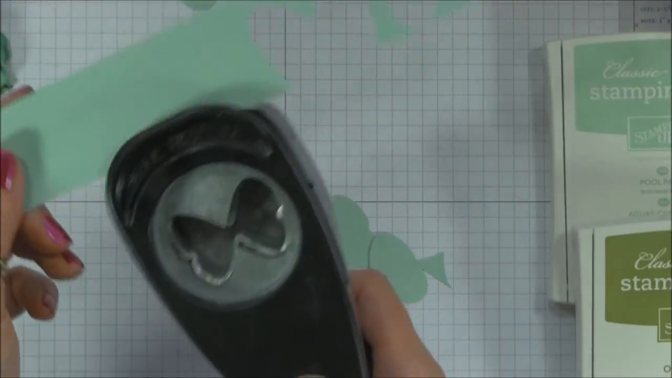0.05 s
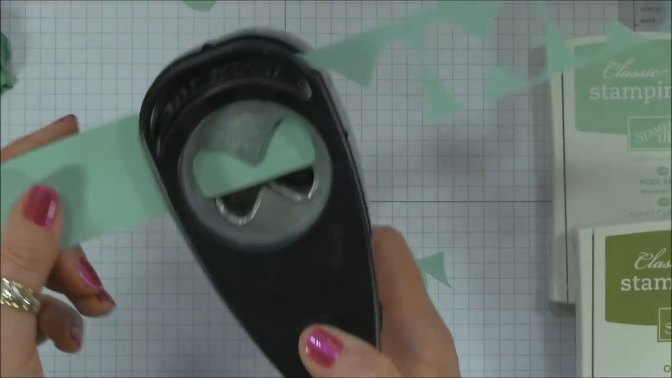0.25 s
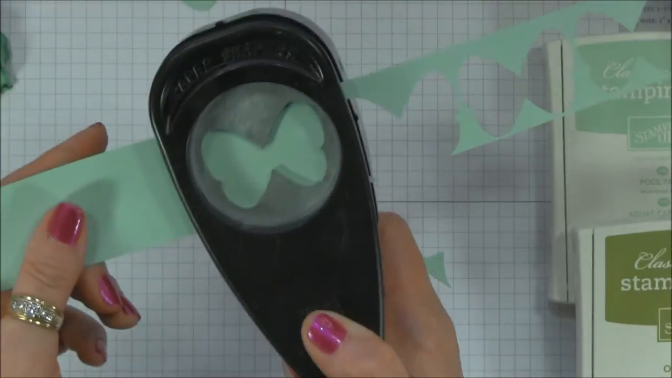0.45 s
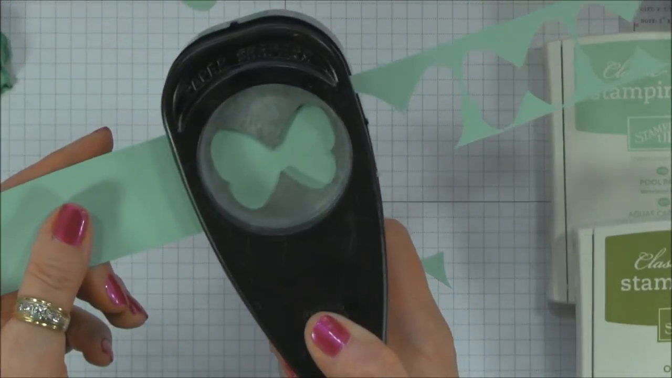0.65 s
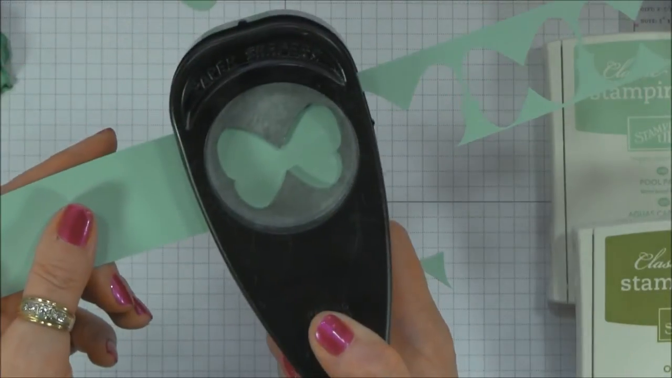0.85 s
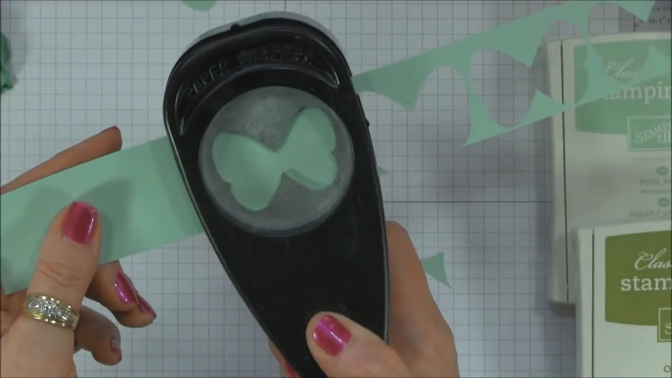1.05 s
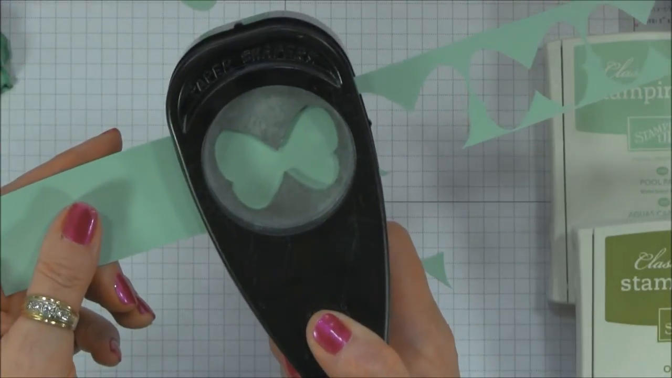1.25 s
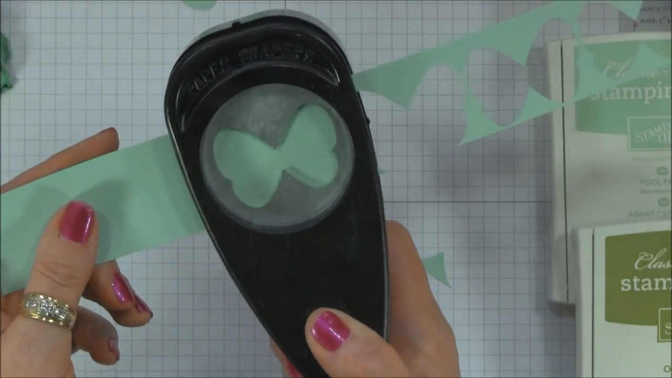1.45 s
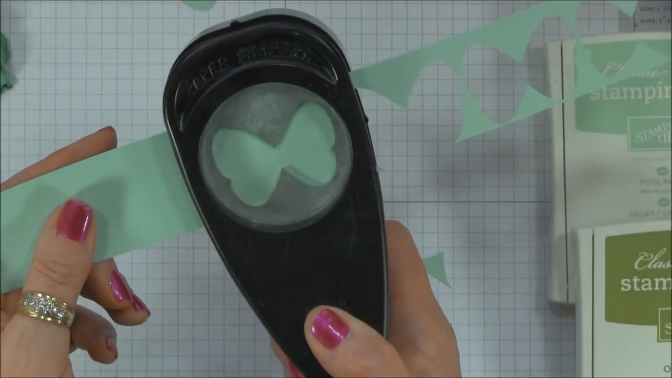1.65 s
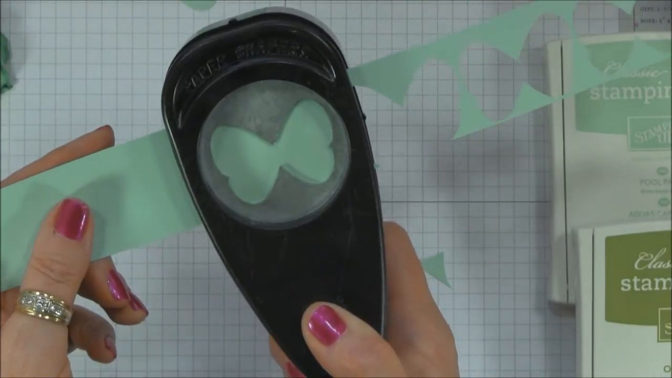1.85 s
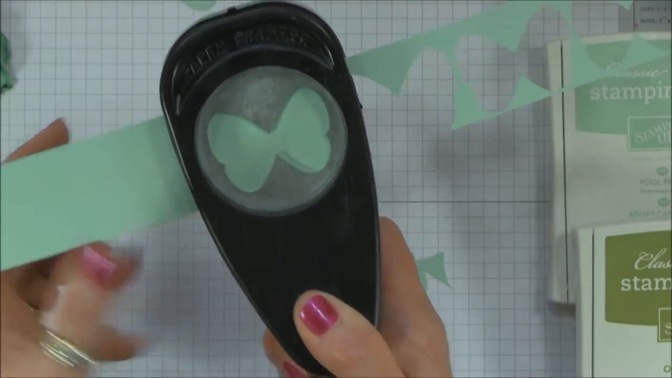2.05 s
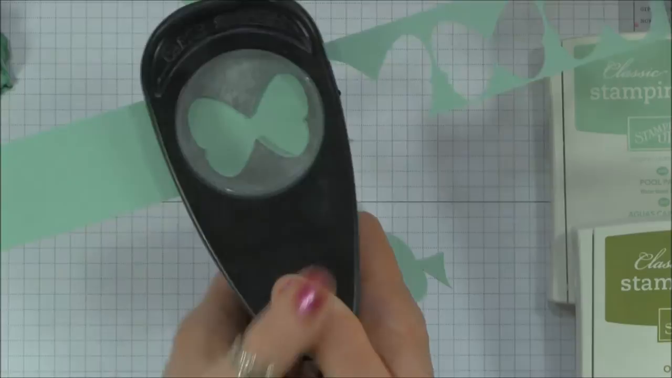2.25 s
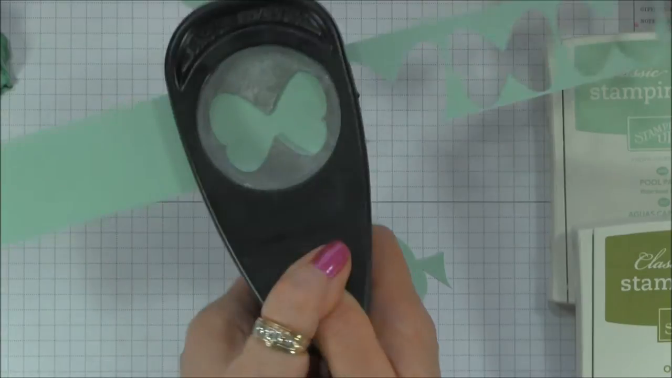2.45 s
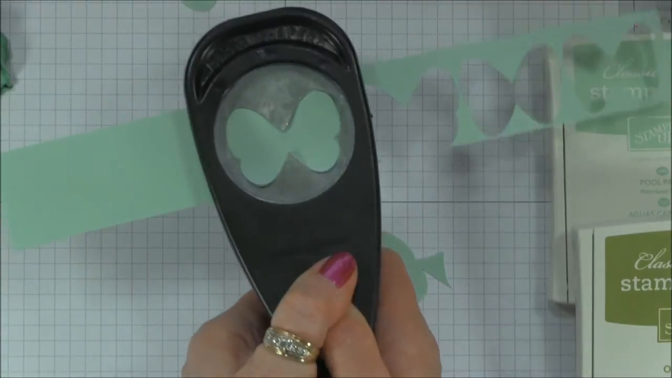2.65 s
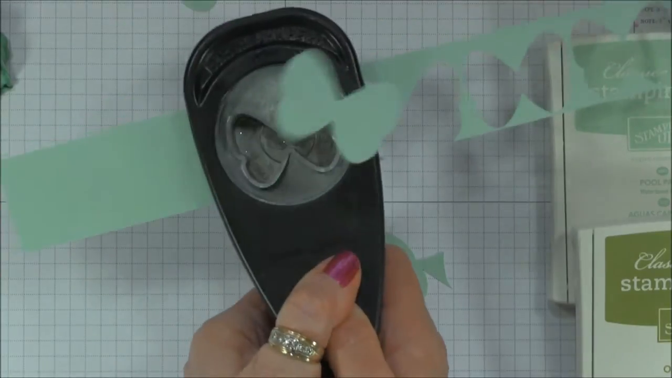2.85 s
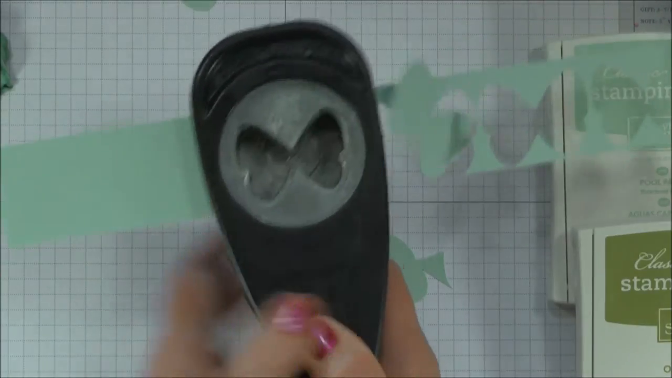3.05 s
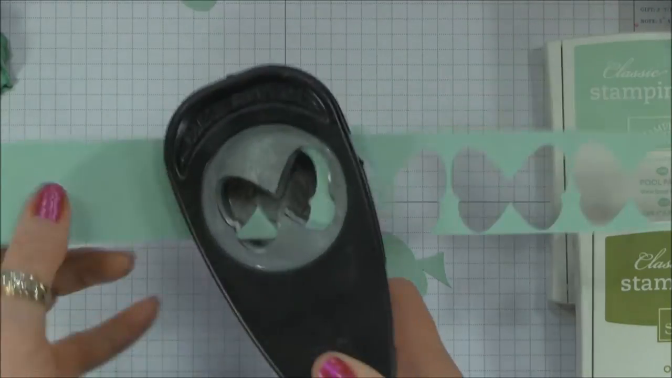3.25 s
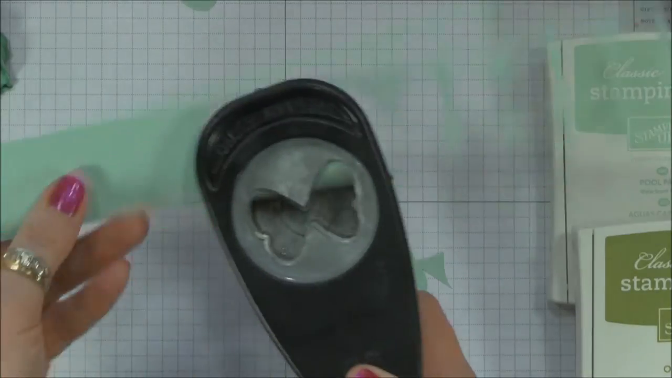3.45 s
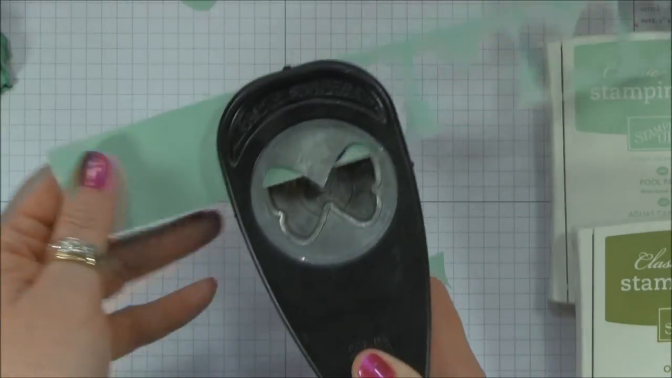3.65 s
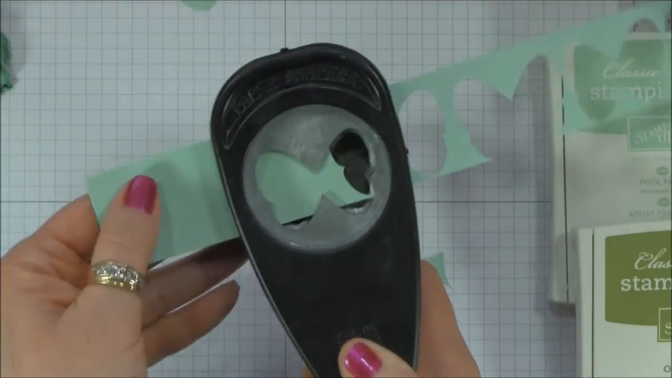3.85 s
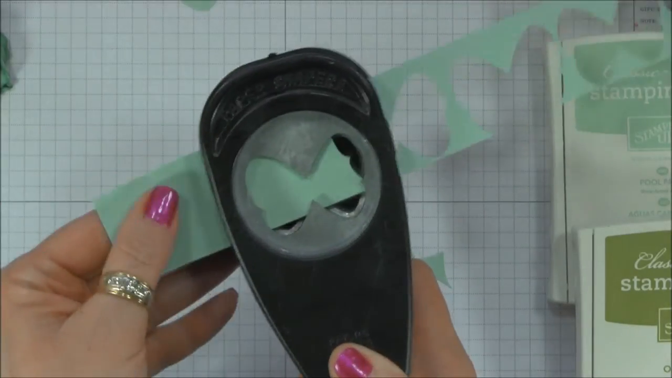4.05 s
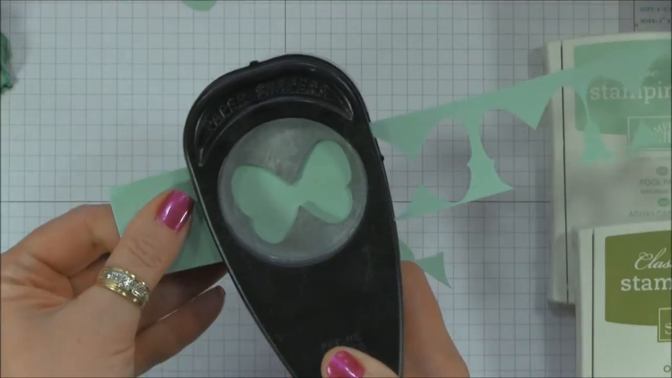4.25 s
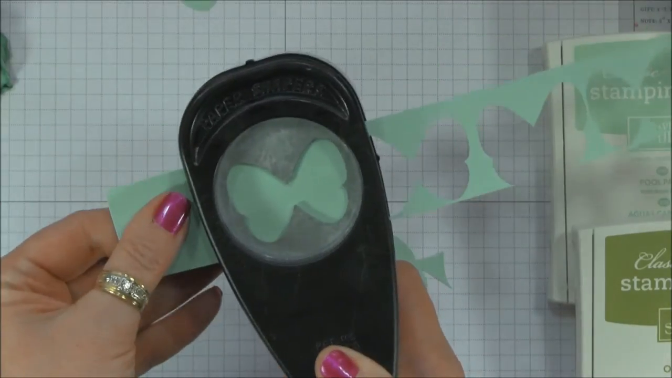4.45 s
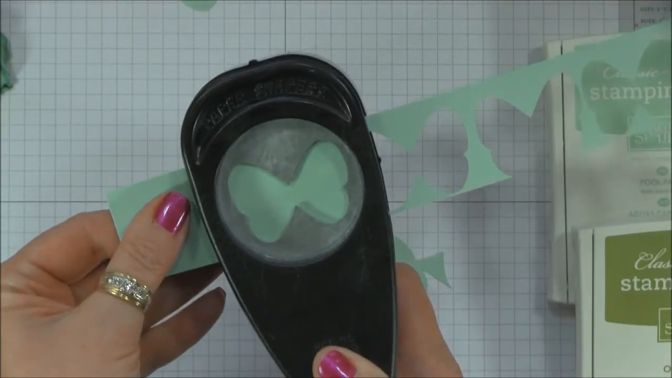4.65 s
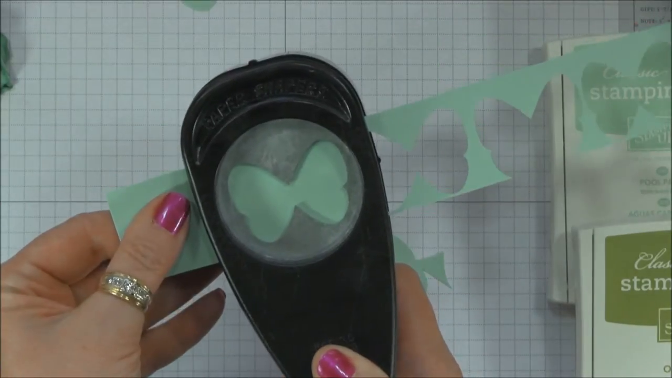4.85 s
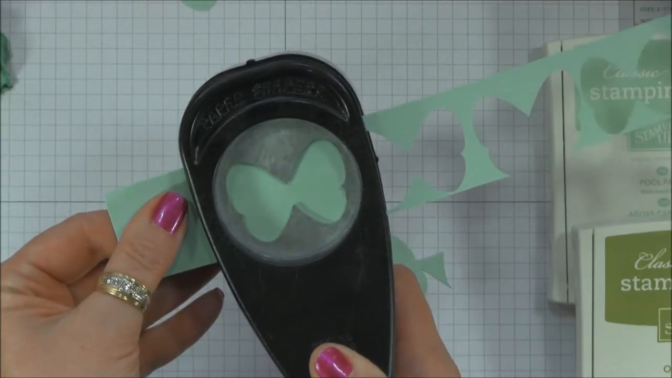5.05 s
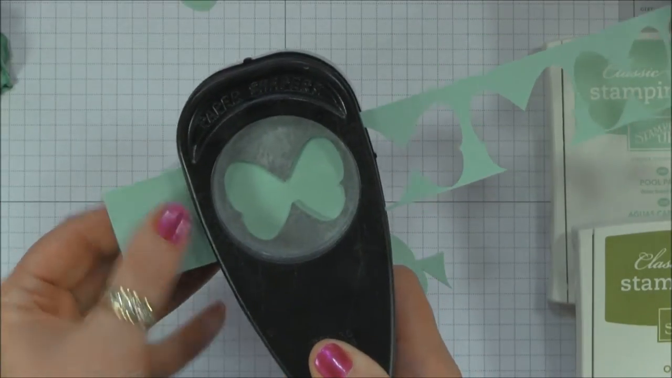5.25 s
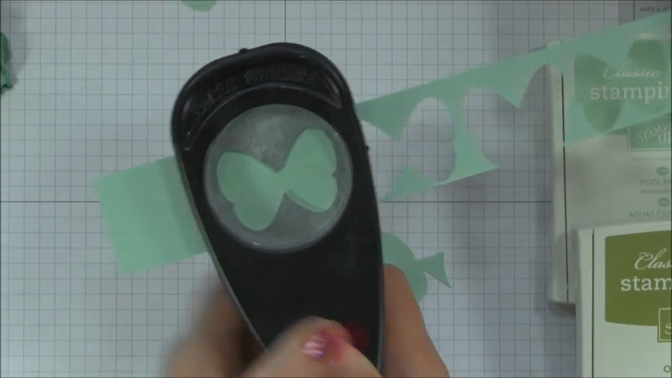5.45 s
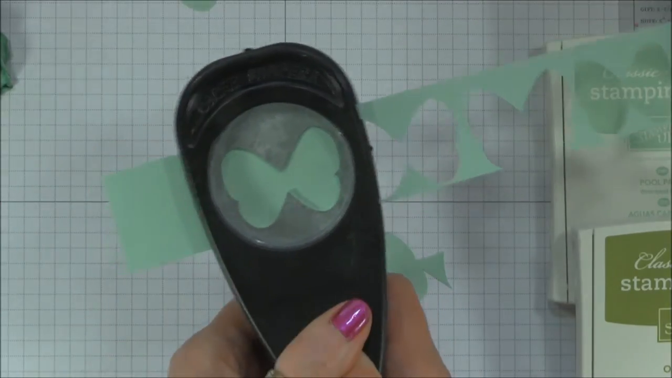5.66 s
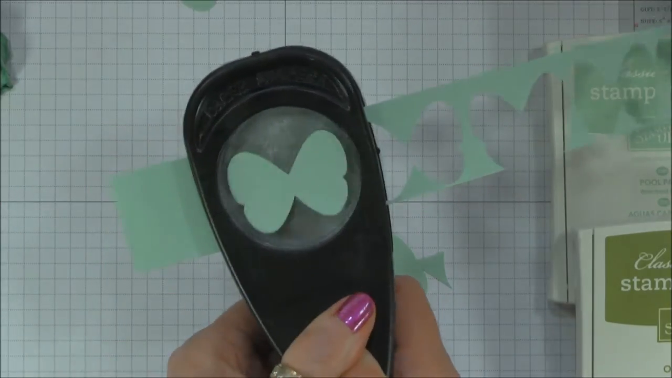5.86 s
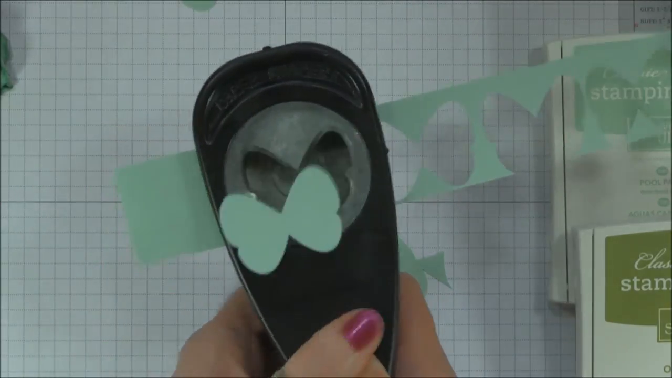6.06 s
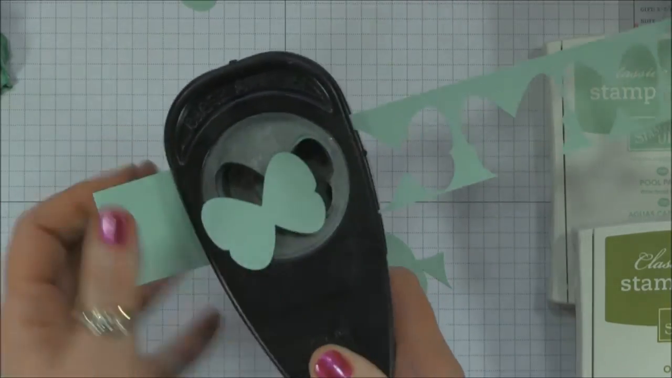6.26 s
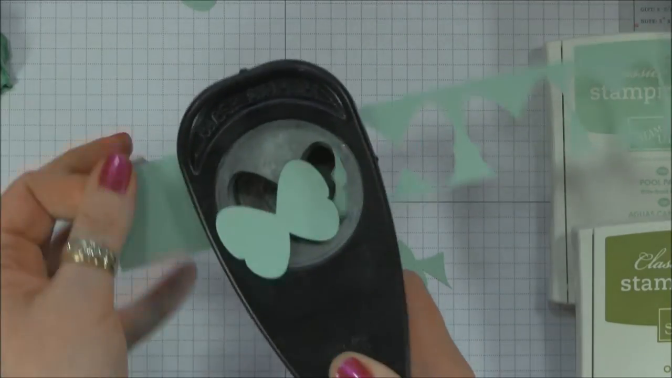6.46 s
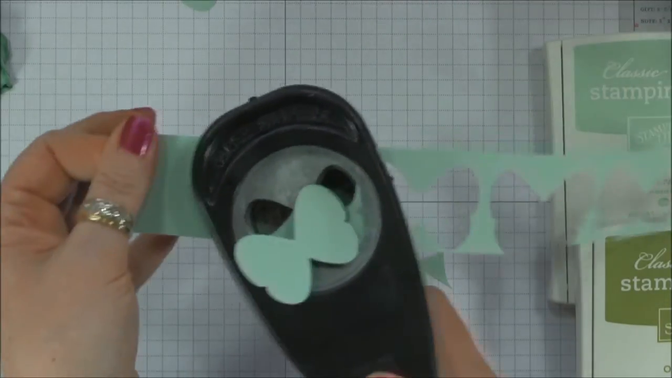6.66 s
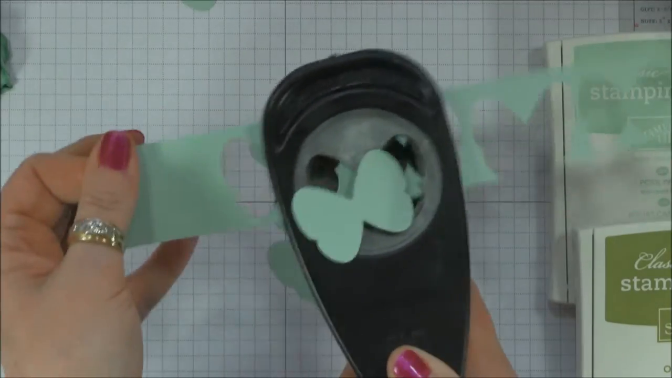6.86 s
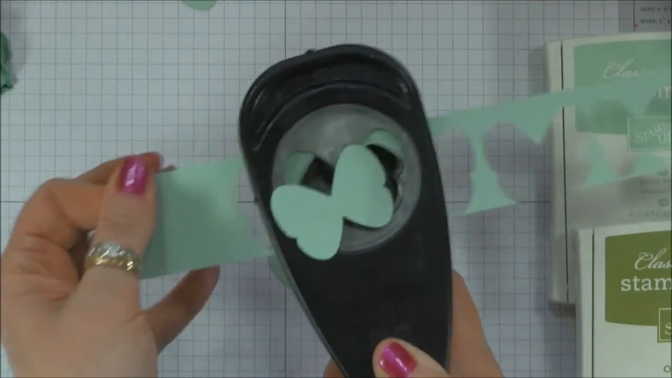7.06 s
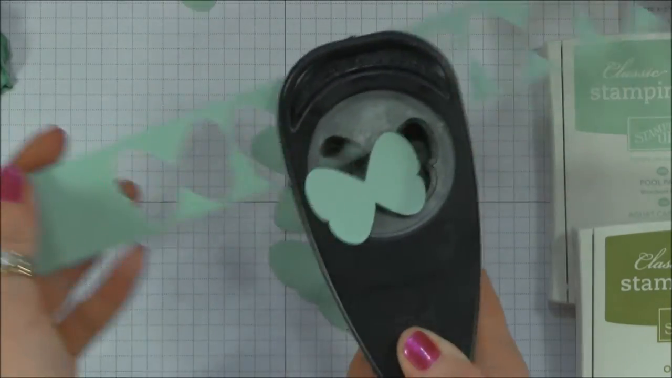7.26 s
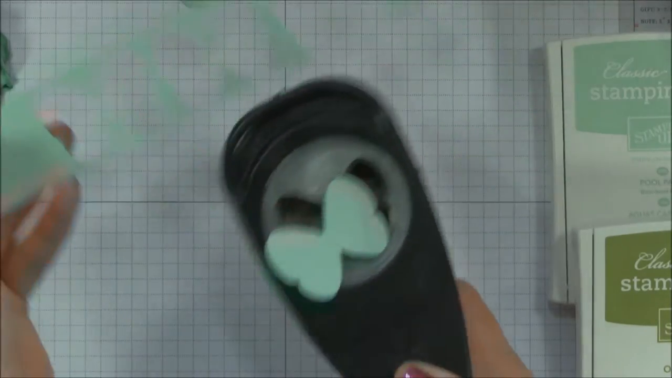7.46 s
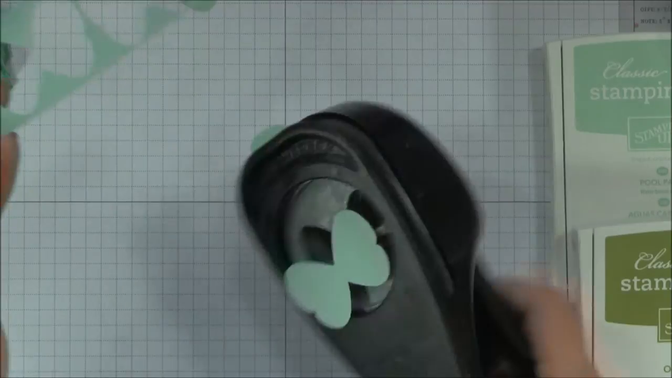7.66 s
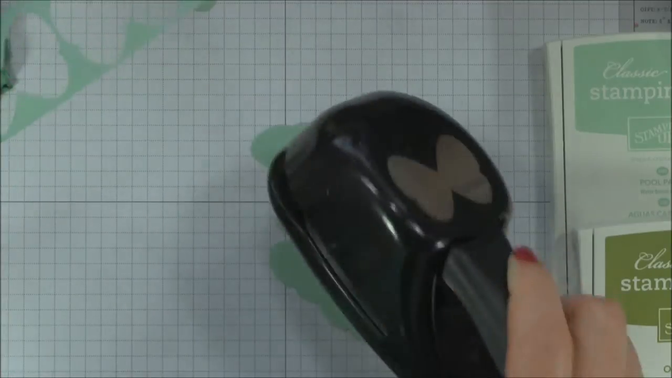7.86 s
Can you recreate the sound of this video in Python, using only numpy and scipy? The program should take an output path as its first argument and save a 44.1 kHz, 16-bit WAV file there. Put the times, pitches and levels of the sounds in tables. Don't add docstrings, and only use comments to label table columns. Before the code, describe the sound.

A hand-held lever punch cuts stiff card twice. Each cut is a sharp gritty crack followed quickly by a much louder, dry clack with brief metallic ringing. Before, between and after come quiet brushing of card through the slot, little ticks, finger taps and faint dull table bumps. The last seconds are light scraping, thin and dry, fading to small clicks. Near microphone, small reflective room, quiet hum and hiss.

```python
import sys
import numpy as np
from scipy import signal
from scipy.fft import rfft, irfft, next_fast_len
from scipy.io import wavfile

SR = 44100
rng = np.random.default_rng(int(sys.argv[2]) if len(sys.argv) > 2 else 0)


def dump(signal):
    limited = np.clip(np.atleast_2d(signal).T, -1, 1)
    pcm = np.round(limited * 32767).astype(np.int16)
    wavfile.write(sys.argv[1], SR, pcm)


def boost(x):
    u = np.asarray(x, float) / 20
    return 10 ** u


N = 348390


def rms_one(x):
    return x / np.sqrt(np.mean(x ** 2) + 1e-20)


def at_hz(points, hz):
    points_hz, values = np.array(points).T
    return np.interp(np.log(hz), np.log(points_hz), values)


def fade(x, t60_s):
    r = 10 ** (-6 / (t60_s * SR))
    return signal.lfilter([1 - r], [1, -r], x + 1e-18)


def add(track, s, sound):
    at = round(s * SR)
    track[..., at:at + sound.shape[-1]] += sound[..., :N - at]


def coloured(spectrum):
    size = next_fast_len(N)
    hz = np.maximum(np.arange(size // 2 + 1) * SR / size, 1)
    white = rfft(rng.standard_normal(size))
    return rms_one(irfft(white * boost(at_hz(spectrum, hz)), size)[:N])


def grit(shape, spread_db):
    size_db = spread_db * np.minimum(rng.exponential(1, shape), 5)
    return rms_one(boost(size_db) * rng.choice([-1, 1], shape))


def band_of(x, low_hz, high_hz):
    return signal.sosfilt(signal.butter(2, [low_hz, high_hz], "band", fs=SR, output="sos"), x)


def tone(hz, t60_s, swell_s, blur_hz, blur, smear_db):
    t = np.arange(round(t60_s * SR)) / SR
    detune, phase = rng.random((2, 2, 5, 1))
    beside = np.array([[0], [1], [1], [1], [1]])
    line_hz = hz + min(blur_hz, hz / 4) * (detune - .5) * beside
    lines = np.sin(2 * np.pi * (line_hz * t + phase))
    smear = blur * boost(smear_db * t / t60_s) * lines[:, 1:].sum(axis=1)
    return (lines[:, 0] + smear) * boost(-60 * t / t60_s) * (1 - np.exp(-t / swell_s))


def contact_power(table, colour, hz, shear_s, lead_s, offset_db):
    out = np.zeros(N)
    t = np.arange(SR // 25) / SR
    burst = (t / shear_s) ** 4 * np.exp(-(t / shear_s) ** 2)
    burst /= burst.sum()
    lag_s = 0.0021 * np.log2(4000 / hz).clip(0, 4)
    for s, level_db, knock_db, crack_db, body_db in table:
        tilt = [(700, knock_db), (1000, body_db), (1600, body_db), (2100, 0.0024), (4400, 0.0069),
                (6000, crack_db)]
        band_db = level_db + offset_db + at_hz(tilt, hz) + at_hz(colour, hz)
        add(out, s - lead_s + lag_s, boost(2 * band_db) * burst)
    return out


def hum_and_hiss():
    # (frequency [Hz], level [dB])
    hum_mid = [(15, -14), (28, -6.5), (42, -8.5), (62, 4.5), (80, -5.5), (115, -3.5), (187, -13),
               (295, -9.5), (357, -18.5), (460, -17.5), (700, -24), (1440, -23.5), (2900, -27.5),
               (12100, -33.5), (16000, -38.5)]
    hum_side = [(12, -32.5), (20, -7), (107, -5), (347, -6), (527, -9), (678, -11), (780, -13),
                (1330, -15.5), (1710, -19), (2750, -22), (3070, -23), (12400, -32), (16000, -37.5)]
    return np.array([boost(-68.5) * coloured(hum_mid), boost(-69) * coloured(hum_side)])


def small_parts():
    # (time [s], level of each mode [dB])
    edge = [
        [(1740, .11), (3070, .11)],
        [(.101, -64, -68)],
    ]
    slot = [
        [(1960, 0.21), (3120, 0.11), (5330, 0.14)],
        [ (.2, -64.5, -80, -76), (.3, -57.5, -75, -82), (6.16, -80, -56, -80), (7.749, -59.5, -61.5, -61), (7.854, -80.5, -62.5, -74)],
    ]
    strip = [
        [(1258, 0.15), (3600, 0.2)],
        [(.27, -57.5, -79), (3.5, -72, -77), (3.85, -64, -59.5), (3.95, -66.5, -72), (4.001, -67, -76), (6.186, -50.5, -80), (6.225, -60, -77.5), (6.601, -66, -80)],
    ]
    die = [
        [(2640, 0.18), (3420, 0.18)],
        [(1.06, -73, -85), (4.103, -60, -61), (4.6, -75, -85), (6.401, -65.5, -80)],
    ]
    handle = [
        [(665, 0.22), (1175, .25), (3680, .2)],
        [ (2.078, -63.5, -63, -62), (2.106, -51, -51.5, -55), (2.47, -61, -73.5, -80), (2.53, -79, -62, -79), (2.595, -37, -34.5, -41), (5.693, -75, -58.5, -75), (5.801, -60, -52, -58.5), (6.628, -85.5, -82, -64)],
    ]
    lever = [
        [(2440, 0.18), (5030, 0.15)],
        [(2.492, -59, -56), (4.001, -71, -85), (5.331, -73, -87), (5.64, -59.5, -58.5), (5.695, -64, -59)],
    ]
    shell = [
        [(265, 0.22), (450, 0.35), (2450, 0.13), (3460, .22)],
        [(2.594, -55, -43, -31, -33), (5.745, -46, -47, -33.5, -48), (6.41, -81.5, -66, -80, -79.5), (2.85, -54, -80, -80, -80), (3.313, -59.5, -80, -80, -80), (5.945, -56, -80, -80, -80)],
    ]
    stop = [
        [(1545, .055), (2780, 0.048)],
        [(2.85, -17, -27), (5.945, -22, -18)],
    ]
    cut_out = [
        [(3080, 0.26), (4260, 0.31), (6400, 0.24)],
        [(6.277, -62, -71.5, -72), (6.31, -66, -79, -78)],
    ]
    inaudible_db = -79
    out = np.zeros((2, N))
    for modes, hits in (edge, slot, strip, die, handle, lever, shell, stop, cut_out):
        for s, *levels_db in hits:
            for (hz, t60_s), level_db in zip(modes, levels_db):
                if level_db > inaudible_db:
                    note = tone(hz, t60_s, swell_s=0.0023, blur_hz=280.0, blur=.7, smear_db=-6.0)
                    add(out, s, boost(level_db - 3.5) * note)
    return out


def touches(hz):
    # (time [s], peak [dB], body [dB])
    edge_flicks = [(0.1017, -65, -28), (0.1979, -57.5, -15), (2.4056, -63, -13), (2.4466, -53, -8),
                   (2.4725, -44.5, -1), (4.1051, -60, 6), (5.3642, -59, 4), (5.6401, -47.5, 3),
                   (6.277, -59.5, -15), (6.4043, -59, -16), (6.6298, -53.5, -6.5), (7.7533, -54, -3),
                   (7.857, -51.5, -2)]
    lever_ticks = [
        (1.0614, -67, 5),
        (1.728, -54, -16),
        (2.4932, -40, -3),
        (5.1104, -50.5, -25),
        (5.6945, -44.5, -11),
    ]
    finger_knocks = [
        (2.0807, -54.5, 4),
        (2.1086, -50.5, 10.5),
        (3.257, -65.5, 3),
        (3.3113, -51, 5.5),
        (3.3744, -57, 3.5),
        (4.001, -61, 8),
        (5.3338, -67, -3),
        (5.4994, -64.5, 6),
    ]
    # (frequency [Hz], level per Hz [dB])
    touch_colour = [(120, -17), (300, 3), (600, 8.5), (1200, -4.5), (3500, -7), (6000, -3.5), (15500, -19)]
    # contacts, knock dB, crack dB
    kinds = (lever_ticks, -41, -6), (edge_flicks, -10.5, -5), (finger_knocks, -3, -7.5)
    contacts = [(s, peak_db, knock_db, crack_db, body_db)
                for table, knock_db, crack_db in kinds for s, peak_db, body_db in table]
    return contact_power(contacts, touch_colour, hz, shear_s=0.0024, lead_s=0.005, offset_db=-16.5)


def slide_power():
    # (peak time [s], rub [dB], rise from 20 dB below [s], brightness [dB])
    drags = [(0.297, -57, .15, -2.3), (.42, -65, .15, -8), (2.08, -71.5, 0.14, -7), (3.06, -55.5, 0.18, -9),
             (3.518, -54.5, 0.0646, -1.5), (3.68, -62, .11, -2.5), (3.856, -55, 0.0638, -5.5),
             (4.19, -71.5, 0.43, -5.5), (5.651, -55.5, 0.055, -9.5), (6.288, -70.5, -0.05, -15),
             (6.548, -65.5, .12, -4), (6.9, -63, .12, -1.5), (7.055, -66, 0.06, -1.5),
             (7.2, -62.5, 0.1, -1), (7.28, -64, 0.2, 0), (7.37, -64.5, -0.03, 3), (7.479, -69.5, 0.2, 1.7)]
    # (time [s], rub [dB], fall by 20 dB [s], brightness [dB])
    tugs = [
        (.205, -78, 0.08, -11),
        (2.158, -61.5, 0.13, -16),
        (3.256, -70, 2, -3),
        (3.318, -59.5, .25, -17),
        (4.01, -68.5, 0.2, -21),
        (6.12, -53, 0.24, -6),
        (6.404, -69.5, -0.3, 0),
        (6.63, -63.5, 0.27, -8),
    ]
    tug_rise_s = .03
    power, bright = np.full(N, 1e-14), np.zeros(N)
    strokes = [(s, db, span_s, span_s, bright_db, 1.6) for s, db, span_s, bright_db in drags]
    strokes += [(s, db, tug_rise_s, fall_s, bright_db, 1) for s, db, fall_s, bright_db in tugs]
    for s, rub_db, rise_s, fall_s, bright_db, roundness in strokes:
        start_s = max(s - 2 * rise_s, 0)
        t = np.arange(round(2 * (rise_s + fall_s) * SR)) / SR + start_s - s
        stroke = boost(2 * (rub_db - 20 * np.maximum(-t / rise_s, t / fall_s) ** roundness))
        add(power, start_s, stroke)
        add(bright, start_s, stroke * bright_db)
    catches = grit(N, 2.8) ** 2 * (rng.random(N) < 300 / SR)
    return power * (0.67 + 0.23 * catches / catches.mean()), bright / power


def slide_near(hz, rub, bright_db):
    # (frequency [Hz], level per Hz [dB])
    slide_colour = [(180, -46), (300, -9), (744, -9.5), (985, -8.5), (1050, -12), (1260, 2.5), (1670, -9),
                    (2070, -6), (2280, -3.5), (4800, -5), (15500, -18)]
    # (frequency [Hz], change [dB])
    covered_slot = [(950, 3.5), (1260, -2.5), (1700, 0), (2400, -4), (3000, 2.5), (3800, -0.6)]
    cut_out_lands_s = 6.3
    slide = rub * boost(2 * (at_hz(slide_colour, hz) - 35.5))
    if hz > 4000:
        share = at_hz([(4000, 0), (6000, 0.58), (12000, .45)], hz)
        slide *= boost(2 * share * (bright_db + 5.0))
    slide[round(cut_out_lands_s * SR):] *= boost(2 * at_hz(covered_slot, hz))
    return slide


def steel_ring():
    steel_hz = [1165, 1258, 1545, 1607, 1765, 2358, 2611, 2780, 2915, 3160, 3420, 3840, 4288, 4700, 5042,
                5540, 5975, 6200, 6850, 7540, 8685]
    # (t60 [s], level struck at hinge [dB], at spring [dB], at blade [dB], at pivot [dB])
    steel_modes = [(.3, -30, -24, -8, -8.5), (0.2, -15, -17, -10.5, -16.5), (.15, -20, -16, -1, -23.5),
                   (0.51, -7, -20, -8.5, 0.5), (.2, -27, -31, -7, -31), (.2, -9, -2, -16, -18),
                   (0.39, -6, -4.5, -13, -7.5), (0.24, -18, -21.5, -6.5, -37), (0.15, -18, -24, -7, -36),
                   (0.18, -6, -7, -15.5, -19.5), (0.28, -7, -12, -9, -13), (0.24, -3, -1.5, -8.5, -14),
                   (.3, 3, 1, -15.5, -20), (.2, -6.5, -8, -22.5, -18), (0.33, 1, 4.5, -30, -11.5),
                   (0.28, -16, -10, -19, -19), (0.26, -21.5, -5, -20.5, -19),
                   (0.28, -4.5, -3.5, -22, -21.5), (.25, -4.5, -7, -24, -12.5), (0.27, -6, -6, -21.5, -16),
                   (0.18, -14, -15, -27, -25)]
    # (time [s], level [dB])
    struck = [
        [(1.06, -83), (1.724, -60.5)],
        [(2.494, -61), (5.108, -58), (5.694, -64)],
        [(2.594, -43), (2.846, -25.5), (5.744, -41), (5.942, -26.5)],
        [(1.06, -78), (2.404, -62.5), (2.472, -62), (5.335, -76), (6.19, -68), (5.615, -69.5), (5.645, -59)],
    ]
    inaudible_db = -91
    out = np.zeros((2, N))
    for place, blows in enumerate(struck):
        for s, blow_db in blows:
            for hz, (t60_s, *strength_db) in zip(steel_hz, steel_modes):
                level_db = blow_db + strength_db[place]
                if level_db > inaudible_db:
                    note = tone(hz, t60_s, swell_s=0.0017, blur_hz=138.5, blur=.65, smear_db=-18.0)
                    add(out, s, boost(level_db + rng.normal(0, 1.5)) * note)
    return out


def table_thuds():
    # (time [s], peak [dB], boom [Hz])
    thuds = [
        (2.263, -59, 80.7),
        (2.287, -58.5, 93),
        (3.309, -59, 96),
        (5.499, -58, 108),
        (7.856, -62, 113),
    ]
    out = np.zeros(N)
    t = np.arange(SR // 4) / SR
    for s, level_db, boom_hz in thuds:
        add(out, s - .003, boost(level_db + 5.0 - 60 * t / 0.15) * np.sin(2 * np.pi * boom_hz * t))
    return out * [[1], [.25]]


def shears(hz):
    # (time [s], peak [dB], knock [dB], crack [dB], body [dB])
    shear_events = [
        (2.594, -21, 4.5, 2.5, 2.5),
        (2.6775, -41.5, -2, 4.5, 1),
        (5.7448, -23, 2, 0, -0.5),
        (5.7982, -33, -5, 2, 4.5),
    ]
    # (frequency [Hz], level per Hz [dB])
    shear_colour = [(71, -51), (120, -19.5), (156, -23.5), (276, -11.5), (611, -7.5), (780, -3),
                    (1790, -6.5), (2490, -2.5), (2700, -6.5), (3440, -4), (4760, -9), (10500, -19),
                    (15500, -21.5)]
    return contact_power(shear_events, shear_colour, hz, shear_s=0.0025, lead_s=0.0034, offset_db=-16.0)


def snaps(hz):
    # (time [s], peak [dB], knock [dB], crack [dB], body [dB])
    snap_events = [
        (2.8468, -11.5, 0.4, 0.44, 0.5),
        (5.9436, -10.5, 0.75, 0.84, 0.37),
    ]
    # (frequency [Hz], level per Hz [dB])
    snap_colour = [(71, -67), (120, -34.5), (245, -40), (488, -25), (586, -31), (690, -20), (812, -26.5),
                   (1080, -14.5), (1350, -11), (1590, -3.5), (2110, -17.5), (2810, -10), (3050, -14),
                   (3890, -13.5), (15500, -30.5)]
    return contact_power(snap_events, snap_colour, hz, shear_s=0.003, lead_s=0.007, offset_db=-10.5)


def cut_out_buzz(rub, fibres):
    from_s = 6.8
    resting = np.arange(N) > from_s * SR
    buzz = band_of(fibres, 2800, 3130)
    return boost(-10.5) * np.sqrt(fade(rub * resting, .06)) * rms_one(buzz)


def card_in_room(early_share, early_t60_s):
    # (frequency [Hz], t60 [s])
    room_t60 = [(200, 0.12), (500, 0.1), (1200, 0.24), (3000, .28), (7000, .3), (14000, 0.2)]
    # (frequency [Hz], side over mid [dB])
    room_width = [(300, -10.5), (550, -2), (1400, 1.9), (3000, 1.4), (7000, 0.2), (14000, -2)]
    # (frequency [Hz], share of mid that leans left [ratio])
    room_lean = [(250, -.4), (600, -.2), (2000, -.06), (5000, .1), (9000, .14)]
    out = 0
    rub, bright_db = slide_power()
    edges_hz = 120 * 2 ** np.arange(0, 7.2, 1 / 3)
    fibres = grit((2, 2, N), 2.5)
    for k, (low_hz, high_hz) in enumerate(zip(edges_hz, edges_hz[1:])):
        hz, width_hz = np.sqrt(low_hz * high_hz), high_hz - low_hz
        blows = (shears(hz) + snaps(hz) + touches(hz)) * SR * width_hz / 1e4
        power = early_share * fade(blows, early_t60_s) + fade(blows, at_hz(room_t60, hz))
        power += fade(slide_near(hz, rub, bright_db) * width_hz, 0.046)
        noise = band_of(fibres[k % 2], low_hz, high_hz)
        mid, side = np.sqrt(power) * rms_one(noise)
        side = boost(at_hz(room_width, hz)) * side + at_hz(room_lean, hz) * mid
        out = out + np.array([mid, side])
    return out + cut_out_buzz(rub, fibres[1])


def scene():
    mid, side = (hum_and_hiss() + small_parts() + steel_ring() + table_thuds()
                 + card_in_room(early_share=0.078, early_t60_s=0.043))
    return np.array([mid + side, mid - side])


def low_pass(x):
    return signal.sosfilt(signal.butter(12, 16640, fs=SR, output="sos"), x)


def record(dry):
    cut = signal.sosfilt(signal.cheby2(12, 60, 16500, fs=SR, output="sos"), dry)
    return low_pass(cut)


dry = scene()
out = record(dry)
dump(out)
```